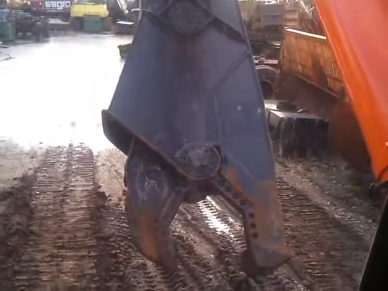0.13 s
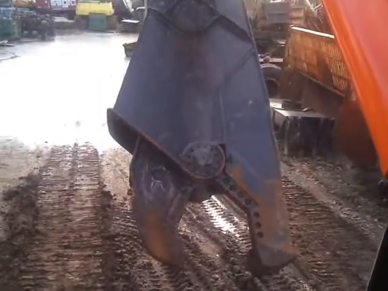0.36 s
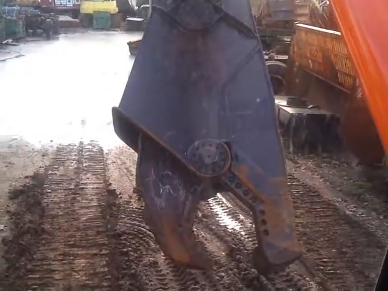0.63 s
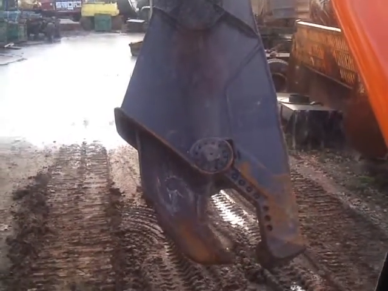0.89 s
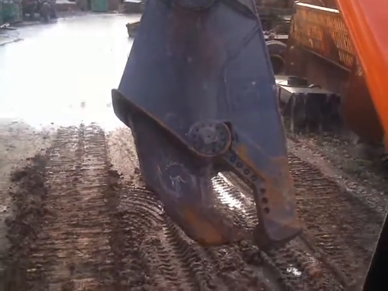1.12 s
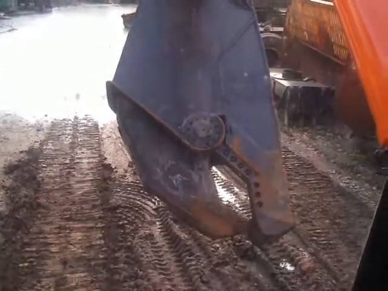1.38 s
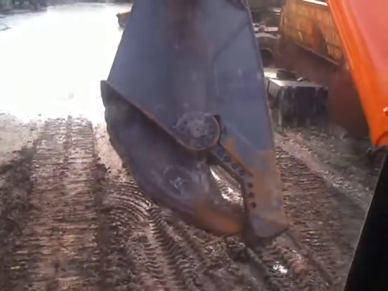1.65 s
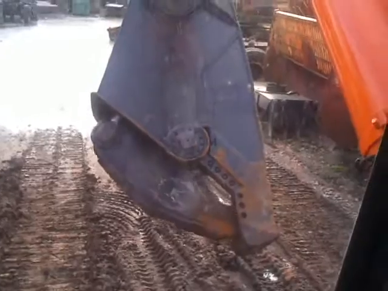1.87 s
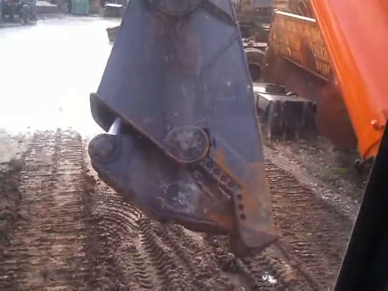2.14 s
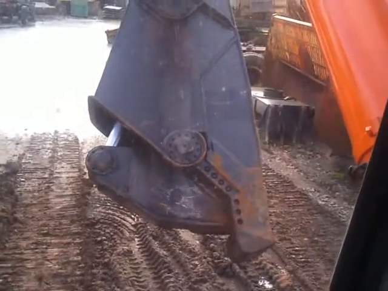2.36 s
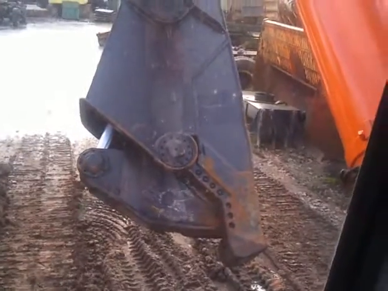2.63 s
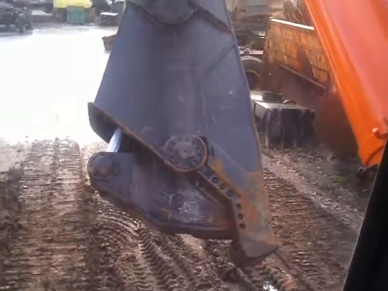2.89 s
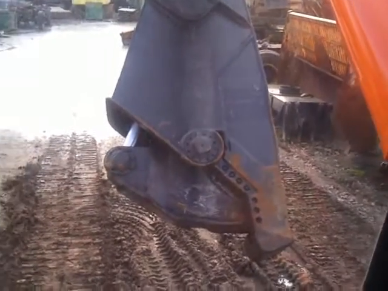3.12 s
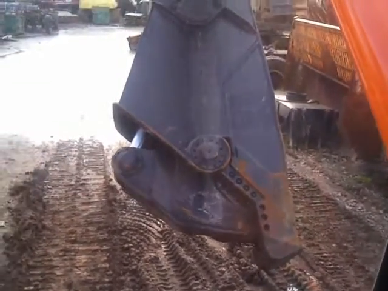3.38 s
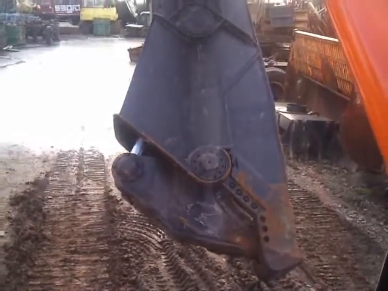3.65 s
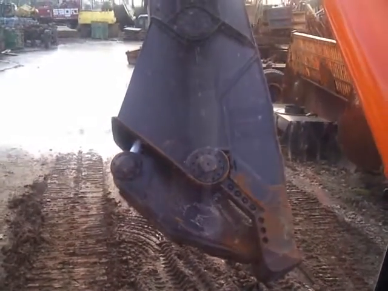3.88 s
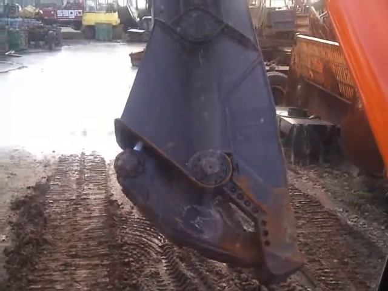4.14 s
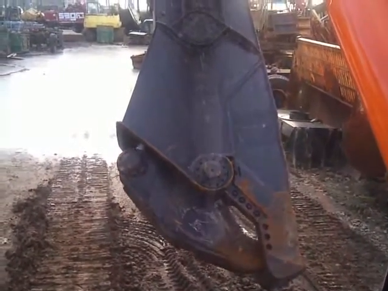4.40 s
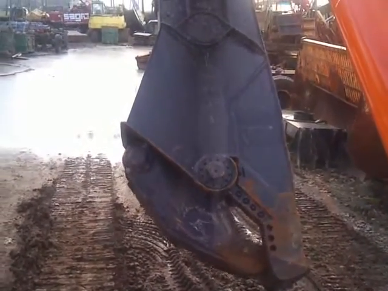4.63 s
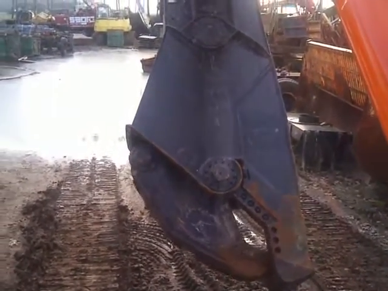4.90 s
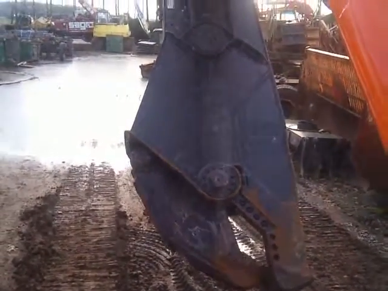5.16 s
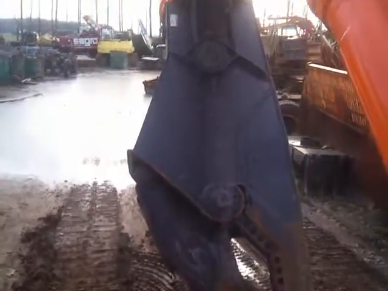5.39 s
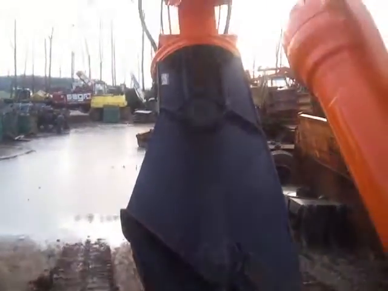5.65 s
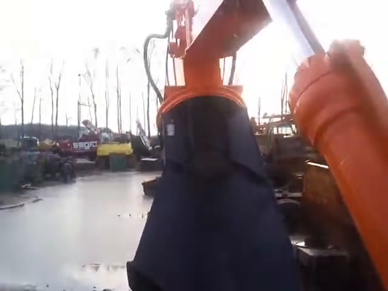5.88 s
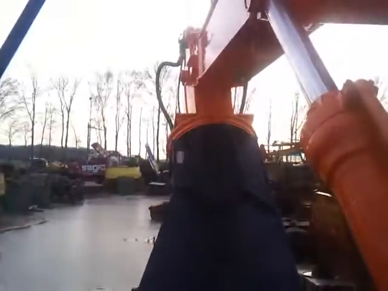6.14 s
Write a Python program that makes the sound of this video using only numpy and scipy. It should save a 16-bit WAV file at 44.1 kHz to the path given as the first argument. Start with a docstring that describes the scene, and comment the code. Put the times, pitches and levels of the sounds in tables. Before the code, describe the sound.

Inside an excavator cab, a steady diesel drone with whining hydraulic pumps sags and surges as a shear jaw works, with one hard knock midway.

```python
"""Inside an excavator cab, one microphone: a six-cylinder diesel drives two hydraulic pumps.
Engine and pumps are tones and knocks locked to the crankshaft, over noise rush and oil hiss; the speed
sags and overshoots as the shear jaw loads and unloads. Cab resonances colour engine, pumps and oil hiss;
the boom is its own narrow band of noise. Pushes ring the frame when the jaw starts or stops, a valve
puffs filtered noise, and a lever, rung as decaying modes, clicks once with a bounce and knocks on its stop."""
import sys
import numpy as np
from scipy import signal
from scipy.fft import rfft, irfft
from scipy.io import wavfile
from scipy.ndimage import uniform_filter1d

SR = 44100
rng = np.random.default_rng(int(sys.argv[2]) if len(sys.argv) > 2 else 0)


def undo_db(level):
    """Turn decibels back into plain size, where 20 dB means ten times bigger."""
    steps = np.asarray(level, float) / 20
    return 10 ** steps


def master(y):
    """Save y as 16-bit WAV."""
    cut = np.clip(np.atleast_2d(y).T, -1, 1)
    pcm = np.round(cut * 32767)  # scale
    wavfile.write(sys.argv[1], SR, pcm.astype(np.int16))


N = 276507
T = np.arange(N) / SR

# engine speed before the flywheel smooths it: (time [s], four-stroke cycles per second [1/s])
ENGINE_SPEED = [(0, 14.25), (.24, 14.38), (.5, 13.0), (.82, 12.36), (1.15, 12.36), (1.54, 13.07),
                (1.75, 13.18), (2.36, 13.19), (2.5, 12.2), (2.66, 12.95), (2.82, 14.85), (2.97, 15.05),
                (3.1, 13.5), (3.44, 12.58), (3.8, 13.02), (4.15, 13.18), (4.4, 13.148), (6.27, 13.148)]
FLYWHEEL_S = .08  # the flywheel rounds off every change of speed
# away from governed speed the engine knocks less evenly: [cycles/s], [dB per cycle/s]
GOVERNED, UNSETTLED_DB = 13.15, -9

# cab panel resonances: (frequency [Hz], width [Hz], lift [dB])
CAB_PANELS = [(50.7, 19, -4), (69, 16, 3.5), (146.6, 14, 9), (174.4, 2.5, 10), (251.7, 13, 2),
              (278, 24, -3), (333.9, 16, 7.5), (542.3, 3.7, 10.5), (872, 3.8, 3), (1053, 16, 6),
              (1371, 27, 7), (1840, 76, 4.5), (2044, 130, 3), (2462, 64, 4), (3730, 750, 2.5)]
# share of the panel lift in dB given to noise: (below the corner [1], above it [1], corner [Hz])
NOISE_LIFT = (0.67, 1.0, 620)
# broad block and cab colour: (frequency [Hz], relative level per Hz [dB])
BLOCK_COLOUR = [(15, -51), (25, -20.5), (96, -11.5), (151, -8.5), (174, -14.5), (221, -19.5), (293, -16),
                (439, -22.5), (543, -18.5), (793, -23), (981, -25.5), (1610, -34.5), (1900, -36.5),
                (5930, -47), (7170, -50.5), (9320, -80.5), (15800, -120)]

# gains that follow the engine speed: (gain at governed speed [dB],
# change per cycle/s above it [dB], change per cycle/s below it [dB])
BOOM_GAIN = (-39, 6, 9)
SECOND_PUMP_GAIN = (-43, -1.1, .3)
EXHAUST_GAIN = (1, -1.2, 4.1)
BLOCK_GAIN = (-35, 1.8, 4.2)

# boom of the cab air: (centre [Hz], width [Hz])
BOOM_BAND = (149, 14)
# oil hiss, low while the jaw rests or turns round: (time [s], level [dB])
HISS_LEVEL = [(0, -52), (.45, -52), (.65, -46.5), (2.8, -45), (3.1, -48), (3.35, -45), (6.27, -44.5)]
# a valve blows off: (time [s], peak level [dB], length [s], centre [Hz], width [Hz])
VALVE_PUFF = (3.03, -47.5, .13, 6200, 2200)

# lever click and its bounce: (time [s], push [dB])
LEVER_CLICKS = [(2.6284, -19.5), (2.63327, -29)]
# lever modes: (frequency [Hz], level [dB], t60 [s])
LEVER_MODES = [(3080, 1, .018), (2700, -7, .01), (5300, -2, .013), (6300, -9, .01), (4700, -11, .01)]
# the lever meets its stop: (time [s], push [dB], push length [ms])
STOP_KNOCKS = [(2.633, -23, .6), (2.6385, -22.5, .5), (2.6442, -27, .6)]
# console modes: (frequency [Hz], level [dB], t60 [s])
CONSOLE_MODES = [(350, -1, .12), (540, -4, .03), (860, -4, .05), (1300, -6, .03), (2050, -9, .015)]

# jolts through the frame: (time [s], push [dB], push length [ms])
FRAME_JOLTS = [(0.392, -23, 7.2), (0.44, -18, 6), (1.81, -16, 7), (2.297, -21, 1.5), (2.306, -22, 1.3),
               (2.317, -22.5, 1.8), (2.326, -22, 1.4), (2.338, -10.5, 3), (2.358, -19, 3),
               (2.374, -17, 3.5), (2.4, -20, 4), (2.418, -20, 7), (2.46, -22, 9), (2.49, -20, 10),
               (2.528, -17.5, 11), (2.57, -22, 9), (3.1, -20, 6.5)]
# frame modes: (frequency [Hz], level [dB], t60 [s])
FRAME_MODES = [(28, -19, .3), (52, -3.5, 0.16), (73.5, -6.5, 0.11), (116.4, -3.5, 0.36), (139, -7.5, 0.15),
               (183, -23.5, 0.077), (220, -13, 0.1), (253, -17, 0.037), (388, -1.5, 0.04), (463, -10, 0.05),
               (534, -0.5, 0.07), (616, -10.5, 0.031), (702, -1.5, 0.35), (800, 4.5, 0.076),
               (860, 3.5, 0.094), (1010, -7.5, .1)]
# loose fittings after a jolt: (level against a 1 ms push [dB], t60 [s], top [Hz])
RATTLE = (-8, .2, 800)
# hollow bump as the load comes off: (time [s], push [dB], push length [ms])
UNLOAD_BUMP = [(2.967, -25, 3), (2.99, -23, 3)]
# modes of that bump: (frequency [Hz], level [dB], t60 [s])
BUMP_MODES = [(221, 0, .22), (250, -7, .15)]

MAIN_PER_CYCLE, SECOND_PER_CYCLE = 5.602, 13.284  # piston pulsations per engine cycle
# harmonics 1, 2, .. of each pump: (relative level [dB])
MAIN_PUMP_DB = [-14.5, -6, -20.5, -14]
SECOND_PUMP_DB = [-3, -3, -5, -7.5, -4]
# main pump under load: (time [s], gain of harmonics 1-2 [dB], gain of harmonics 3-4 [dB])
MAIN_PUMP_GAIN = [(0, -22.5, -24.5), (.25, -26, -22), (.42, -25.5, -20), (.56, -25.5, -31),
                  (.75, -28.5, -31), (.95, -29.5, -37), (1.3, -24.5, -34), (1.6, -25.5, -23.5),
                  (2.2, -24.5, -25.5), (2.37, -23.5, -22), (2.43, -36, -26), (2.55, -24.5, -26),
                  (2.7, -22.5, -19.5), (2.78, -22, -27), (2.85, -22, -28.5), (2.93, -33, -27.5),
                  (2.99, -45, -25.5), (3.05, -29.5, -20.5), (3.12, -23.5, -22), (3.3, -26.5, -29.5),
                  (3.55, -27, -43), (3.8, -22, -25), (4, -24.5, -26), (4.5, -27, -25.5), (5.5, -28, -25),
                  (5.95, -21.5, -26.5), (6.27, -29.5, -27)]
# the second pump groans under load: (time [s], gain added to its harmonic 2 [dB])
SECOND_PUMP_GROAN = [(0, 3.5), (.5, -10), (.62, 12), (.75, -3.5), (.95, 7), (1.1, 2.5), (1.25, -6.5),
                     (1.42, 12), (1.6, -5), (2.25, 2.5), (2.4, 6), (2.6, 7), (2.7, 3), (3.2, 4), (3.3, 1.5),
                     (3.5, -2), (3.7, 7), (3.9, 2), (6.27, 4)]

# gear and valve tones: (multiple of the engine cycle [1], relative level [dB])
GEAR_TONES = [(30, -49.5), (42, -47.0), (43, -50.0), (48, -47.0), (57, -48.5), (60, -54.0), (62, -50.5),
              (63, -50.5), (66, -56.5), (69, -51.0), (72, -55.0), (73, -55.0), (74, -45.0), (75, -54.0),
              (76, -51.0), (77, -51.5), (78, -53.5), (80, -55.5), (83, -54.0), (84, -52.5), (87, -56.5),
              (90, -53.5), (92, -57.0), (93, -53.0), (95, -57.5), (96, -58.5), (97, -55.5), (102, -54.0),
              (103, -53.0), (106, -59.5), (107, -61.0), (117, -59.5), (123, -61.5), (126, -57.0),
              (129, -58.5), (132, -57.0), (135, -64.0), (137, -63.0), (142, -62.0), (145, -62.5),
              (146, -61.0), (147, -58.0), (148, -59.5), (150, -64.5), (153, -62.0), (155, -66.0),
              (159, -62.0), (160, -62.5), (165, -64.5), (169, -62.0), (171, -61.5), (183, -63.5),
              (184, -64.0), (189, -66.5), (190, -65.0), (193, -65.5), (280, -71.0), (540, -70.5)]
# wavering of those tones: (spread [dB], changes per second [1/s])
GEAR_WAVER = (1.5, 6)
# exhaust tones: (multiple of the engine cycle [1])
FIRING_ORDERS = [2, 3, 4, 6, 9, 12, 18]
# the same tones: (relative level [dB])
FIRING_DB = [-50.5, -50, -42, -38, -46.5, -41.5, -58]
WAVER_DB = 1.1  # spread for the exhaust and the second pump
CLATTER_DB, RUSH_DB = -6, -4  # block sources before the cab colours them


def columns(rows):
    """Curve columns at every sample."""
    s, *values = np.transpose(rows)
    return [np.interp(T, s, v) for v in values]


def unit(x):
    """Scaled to rms 1."""
    return x / np.sqrt(np.mean(x ** 2))


def walk(rate):
    """Random levels held 1 / rate s and slewed twice; spread near 1."""
    hold = int(SR / rate)
    levels = np.repeat(rng.standard_normal(N // hold + 1), hold)
    slewed = uniform_filter1d(uniform_filter1d(levels, hold), hold)
    return 1.3 * slewed[:N]


def above(x, hz):
    """High-pass, second order."""
    return signal.sosfilt(signal.butter(2, hz, "high", fs=SR, output="sos"), x)


def noise_band(low_hz, high_hz):
    """Band of noise at rms 1."""
    band = signal.butter(2, [low_hz, high_hz], "band", fs=SR, output="sos")
    return unit(signal.sosfilt(band, rng.standard_normal(N)))


def speed():
    """Engine cycles per second at every sample, smoothed by the flywheel's inertia."""
    return uniform_filter1d(columns(ENGINE_SPEED)[0], int(FLYWHEEL_S * SR))


def governed(level):
    """A gain that changes as the engine races or labours."""
    db, racing_db, labouring_db = level
    off = speed() - GOVERNED
    return undo_db(db + racing_db * off.clip(0) + labouring_db * (-off).clip(0))


def settled():
    """Gain of the even knocking, lost as the engine leaves its governed speed."""
    return undo_db(UNSETTLED_DB * abs(speed() - GOVERNED))


def cab_db(hz):
    """Lift by the cab panel resonances in dB."""
    return sum(db / (1 + (2 * (hz - centre) / width) ** 2) for centre, width, db in CAB_PANELS)


def cab_colour(x):
    """Broad block colour, lifted at the cab panel resonances."""
    hz = np.fft.rfftfreq(N, 1 / SR) + 1
    at, db = np.transpose(BLOCK_COLOUR)
    low, high, corner_hz = NOISE_LIFT
    lift = np.where(hz < corner_hz, low, high) * cab_db(hz)
    colour = np.interp(np.log(hz), np.log(at), db)
    return irfft(rfft(x) * undo_db(colour + lift), N)


def tones(cycles, orders, levels_db, waver_db, rate):
    """Wavering sines locked to the crankshaft; each swells as it sweeps through a cab resonance."""
    hop = T[::256]
    cycle_hz = np.gradient(cycles)[::256] * SR
    total = np.zeros(N)
    for order, db in zip(orders, levels_db):
        lift = np.interp(T, hop, cab_db(order * cycle_hz))
        sine = np.sin(2 * np.pi * (order * cycles + rng.random()))
        # sqrt(2): the levels are rms
        total += np.sqrt(2) * undo_db(db + lift + waver_db * walk(rate)) * sine
    return total


def pushes(rows):
    """Smooth force pulses of given time, size and length."""
    push = np.zeros(N)
    for s, db, ms in rows:
        shape = np.hanning(int(ms * SR / 1000) + 3)
        i = int(s * SR)
        push[i:i + len(shape)] += undo_db(db) * shape / shape.sum()
    return push


def ring(push, modes):
    """A force rings a set of decaying modes."""
    t = T[:SR // 2]
    body = np.zeros(len(t))
    for hz, db, t60 in modes:
        body += undo_db(db) * np.sin(2 * np.pi * hz * t) * np.exp(-np.log(1000) * t / t60)
    return signal.fftconvolve(push, body)[:N]


def boom():
    """The cab air booms as one narrow band of noise, louder whenever the engine leaves governed speed."""
    hz, width = BOOM_BAND
    return governed(BOOM_GAIN) * noise_band(hz - width / 2, hz + width / 2)


def oil_hiss():
    """Turbulent noise above 2800 Hz, coloured by the cab and following the jaw's work."""
    hiss = above(cab_colour(rng.standard_normal(N)), 2800)
    return undo_db(columns(HISS_LEVEL)[0] + .5 * walk(11)) * unit(hiss)


def valve():
    """A short puff of high hiss that swells and dies as a bell curve."""
    s, db, length, hz, width = VALVE_PUFF
    envelope = np.exp(-(2 * (T - s) / length) ** 2)
    return undo_db(db) * noise_band(hz - width / 2, hz + width / 2) * envelope


def lever():
    """Sharp taps on a small hard part, then duller knocks into the console."""
    tap = np.zeros(N)
    for s, db in LEVER_CLICKS:
        tap[int(s * SR)] = undo_db(db)
    return ring(tap, LEVER_MODES) + ring(pushes(STOP_KNOCKS), CONSOLE_MODES)


def rattle():
    """Loose fittings shake as decaying noise; a longer push shakes them less."""
    shake = np.zeros(N)
    rattle_db, t60, top_hz = RATTLE
    for s, db, ms in FRAME_JOLTS:
        i = int(s * SR)
        shake[i:] += undo_db(db + rattle_db) / ms * np.exp(-np.log(1000) * T[:N - i] / t60)
    return shake * noise_band(200, top_hz)


def frame():
    """Each jolt is a smooth push into the frame modes: the longer it lasts, the duller the thud."""
    thud = above(ring(pushes(FRAME_JOLTS), FRAME_MODES), 27)
    bump = ring(pushes(UNLOAD_BUMP), BUMP_MODES)
    return thud + bump + rattle()


def pumps(cycles):
    """Piston pulsation of two pumps geared to the crankshaft."""
    harmonic = np.arange(1, 6)
    low_db, high_db = columns(MAIN_PUMP_GAIN)
    main_db = [db + gain for db, gain in zip(MAIN_PUMP_DB, [low_db, low_db, high_db, high_db])]
    main = tones(cycles, MAIN_PER_CYCLE * harmonic[:2], main_db[:2], .5, 6)
    main += tones(cycles, MAIN_PER_CYCLE * harmonic[2:], main_db[2:], 2.5, 14)
    groan_db = columns(SECOND_PUMP_GROAN)[0]
    second_db = [db + (k == 2) * groan_db for k, db in zip(harmonic, SECOND_PUMP_DB)]
    second = tones(cycles, SECOND_PER_CYCLE * harmonic, second_db, WAVER_DB, 8.7)
    return main + governed(SECOND_PUMP_GAIN) * second


def clatter(cycles):
    """Valves and injectors knock in six bursts a cycle, in a pattern that repeats every cycle."""
    steps = 4096
    place = np.arange(steps) / steps
    burst = np.exp(-(6 * place % 1) / .3)
    pattern = rng.standard_normal(steps) * (1.3 + burst)
    lines = rfft(pattern)
    lines[[order for order, db in GEAR_TONES]] = 0  # these multiples sound as the gear tones
    pattern = irfft(lines, steps)
    knocks = unit(np.interp(cycles % 1, place, pattern))
    knocks = settled() * knocks * undo_db(.5 * walk(22))
    return above(above(knocks, 450), 450)


def block(cycles):
    """Repeating clatter and an air rush that never repeats, through the block and cab colour."""
    rush = rng.standard_normal(N)
    x = cab_colour(undo_db(CLATTER_DB) * clatter(cycles) + undo_db(RUSH_DB) * rush)
    x = x - above(x, 2200)
    x = x / np.std(above(x, 400))  # rms 1 above 400 Hz
    return governed(BLOCK_GAIN) * x


def engine(cycles):
    """The diesel: block noise, exhaust tones at multiples of the cycle, and gear and valve tones."""
    gears = settled() * tones(cycles, *np.transpose(GEAR_TONES), *GEAR_WAVER)
    exhaust = governed(EXHAUST_GAIN) * tones(cycles, FIRING_ORDERS, FIRING_DB, WAVER_DB, 4.6)
    return block(cycles) + exhaust + gears


def scene():
    """All sources at one microphone in the cab."""
    cycles = np.cumsum(speed()) / SR
    background = boom() + oil_hiss() + valve()
    return (background + lever() + frame() + pumps(cycles) + engine(cycles))[None]


def roll_off(x):
    """The treble ends steeply here."""
    return signal.sosfilt(signal.butter(12, 7320, fs=SR, output="sos"), x)


def record(dry):
    """The camera drops the deepest bass and cuts the treble steeply."""
    low_cut = above(dry, 21)
    steep = signal.ellip(10, .3, 70, 7310, fs=SR, output="sos")  # ripple and stop band [dB], corner [Hz]
    mix = signal.sosfilt(steep, low_cut)
    return roll_off(mix)


dry = scene()
out = record(dry)
master(out)
```